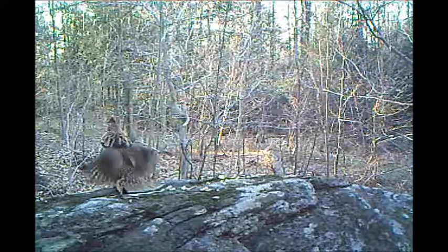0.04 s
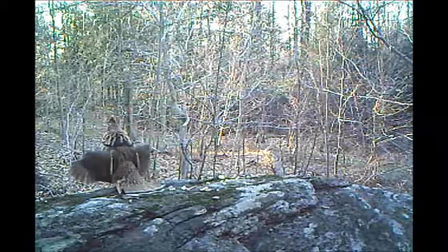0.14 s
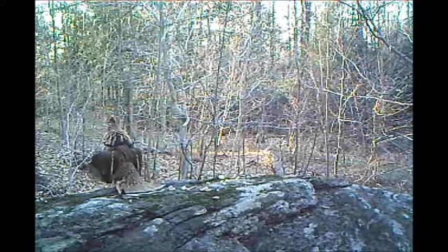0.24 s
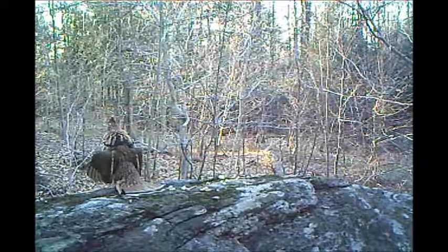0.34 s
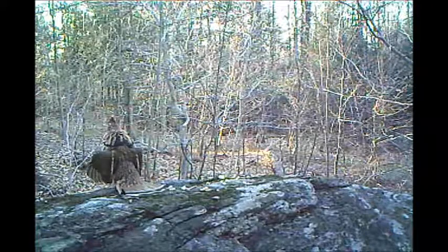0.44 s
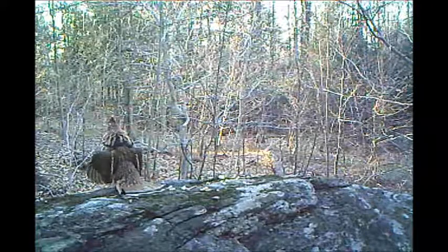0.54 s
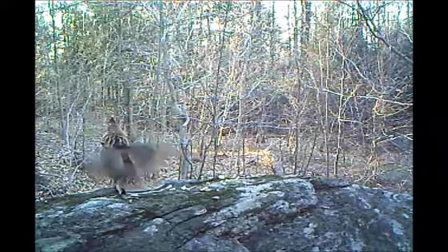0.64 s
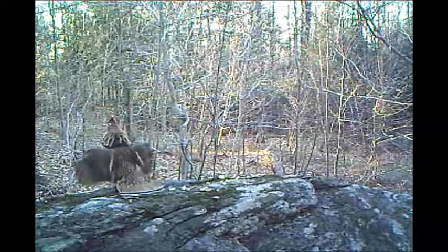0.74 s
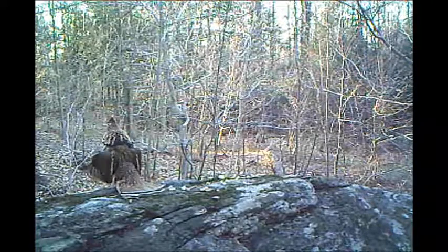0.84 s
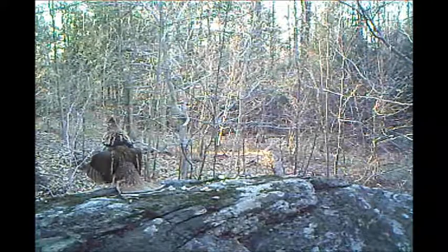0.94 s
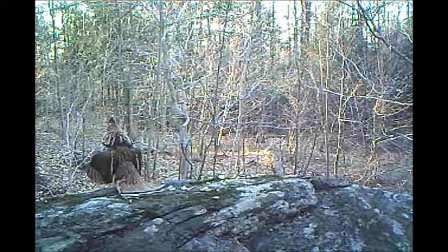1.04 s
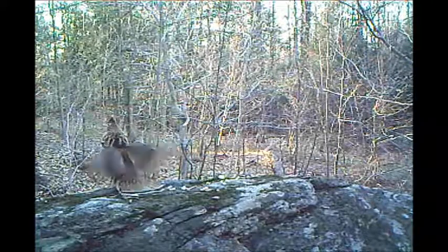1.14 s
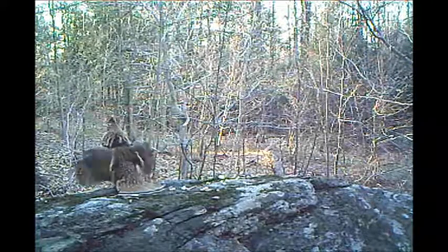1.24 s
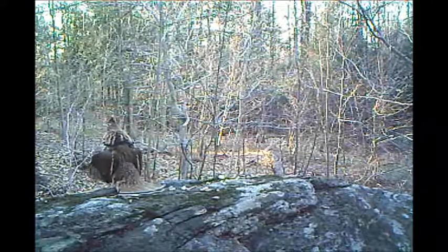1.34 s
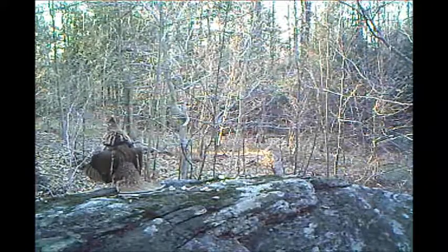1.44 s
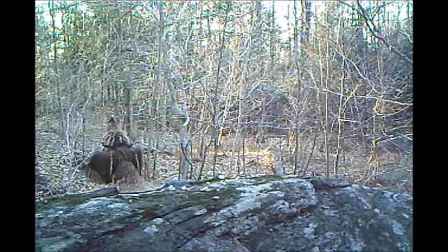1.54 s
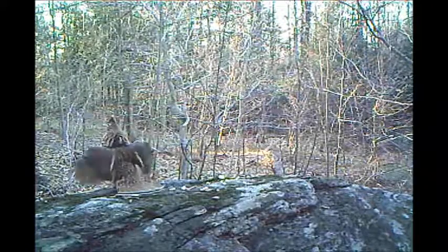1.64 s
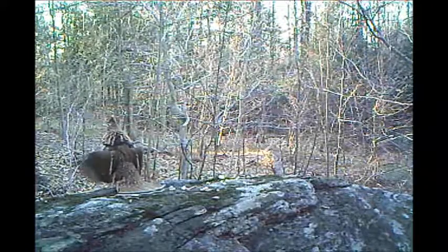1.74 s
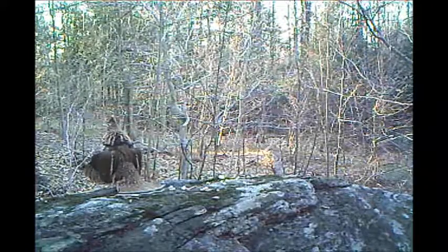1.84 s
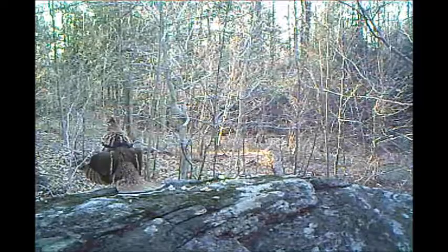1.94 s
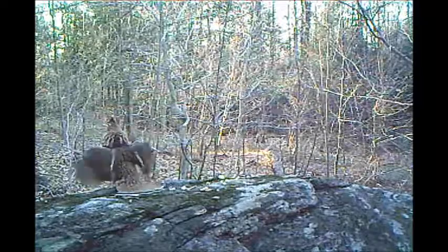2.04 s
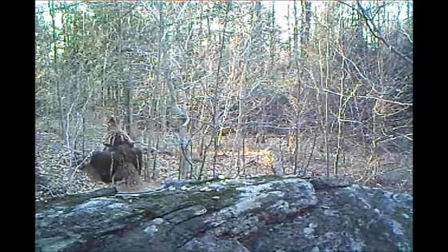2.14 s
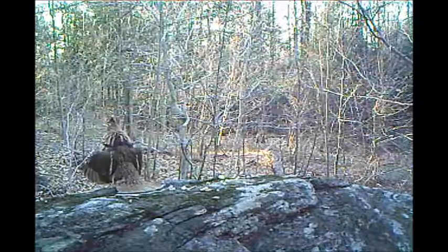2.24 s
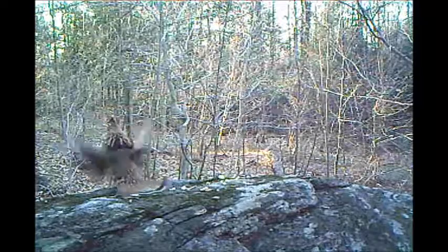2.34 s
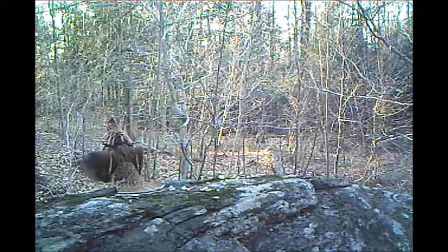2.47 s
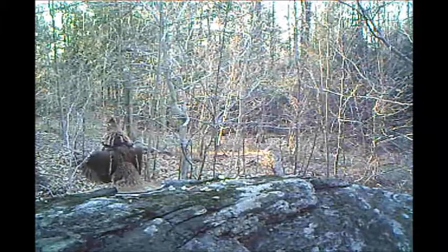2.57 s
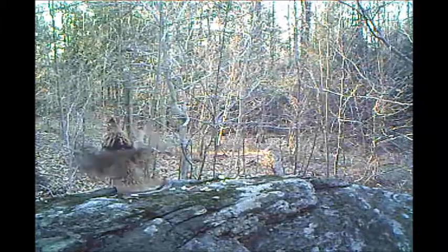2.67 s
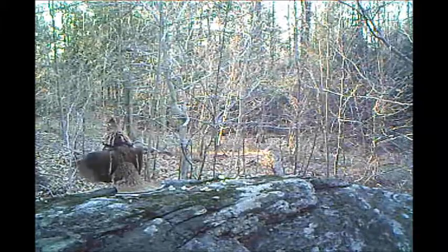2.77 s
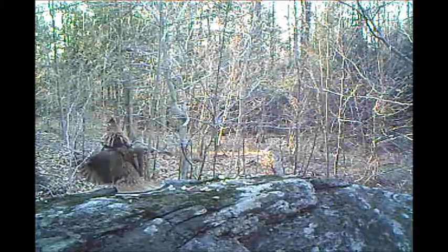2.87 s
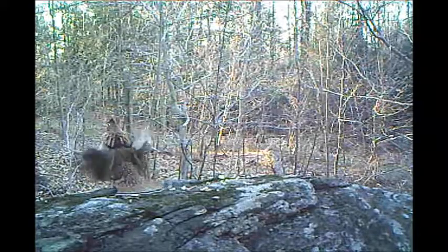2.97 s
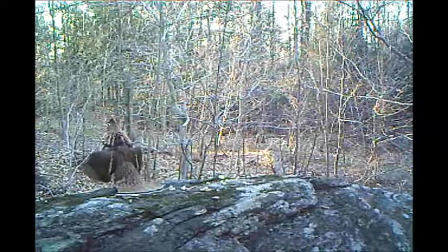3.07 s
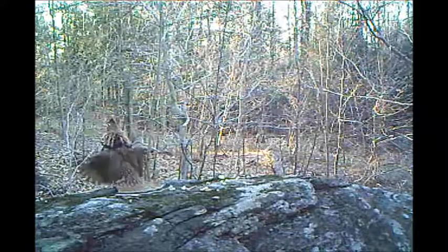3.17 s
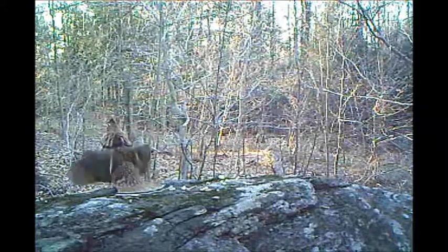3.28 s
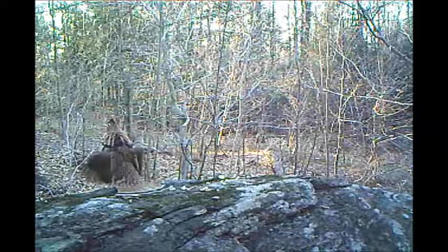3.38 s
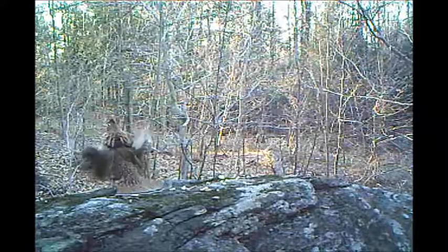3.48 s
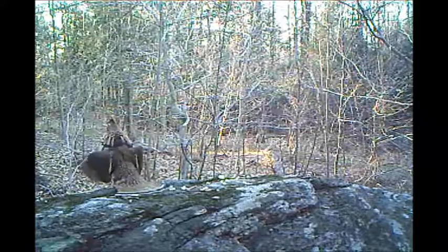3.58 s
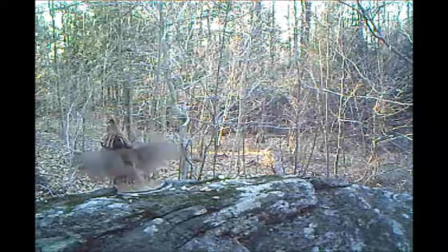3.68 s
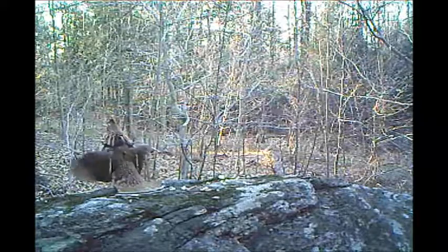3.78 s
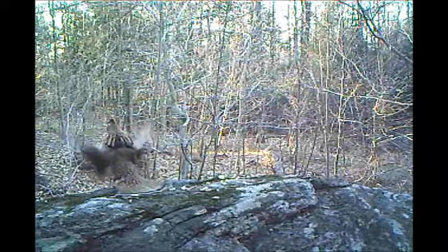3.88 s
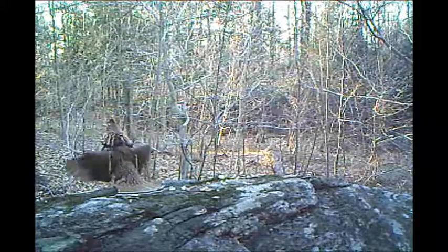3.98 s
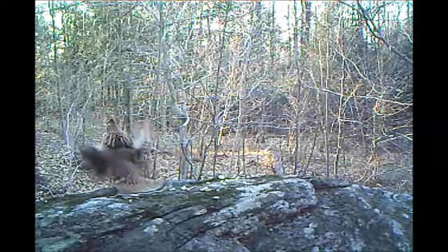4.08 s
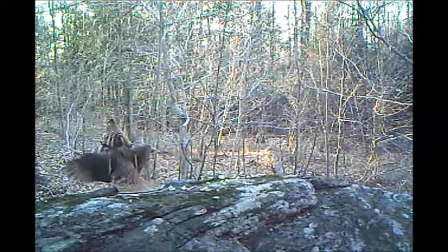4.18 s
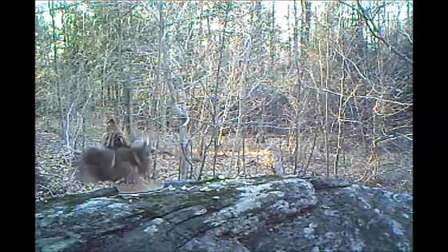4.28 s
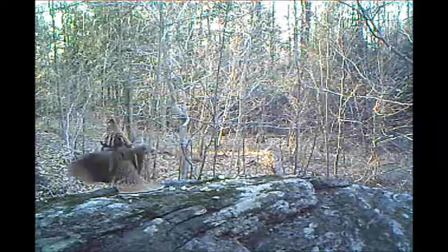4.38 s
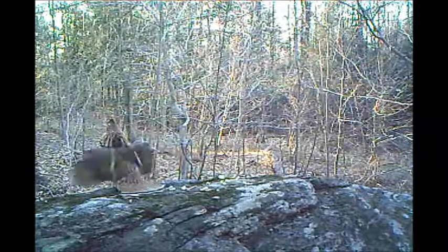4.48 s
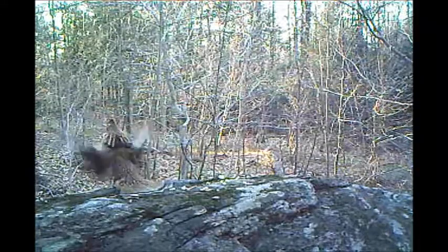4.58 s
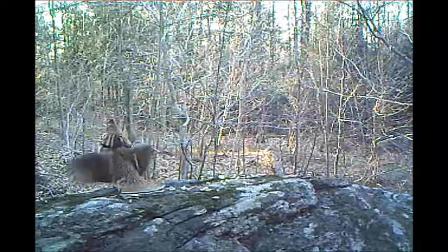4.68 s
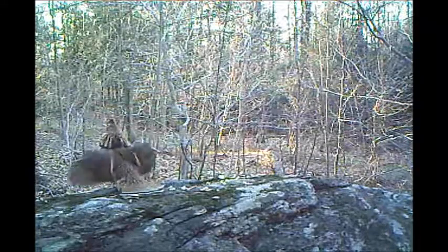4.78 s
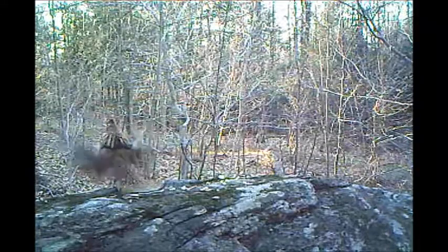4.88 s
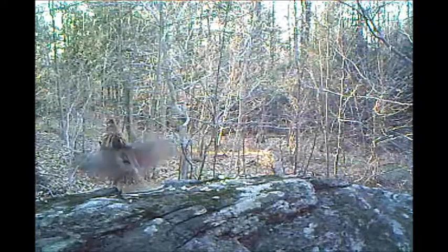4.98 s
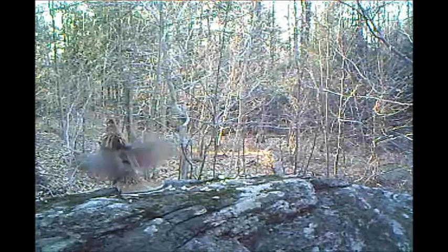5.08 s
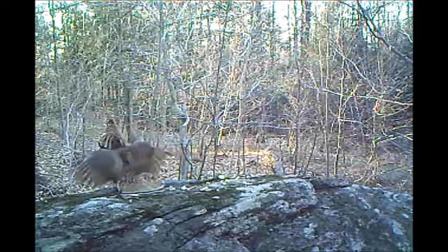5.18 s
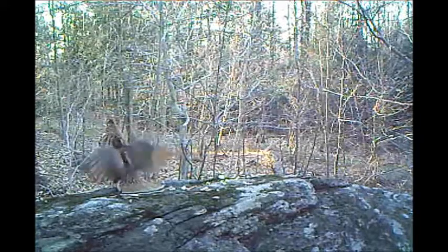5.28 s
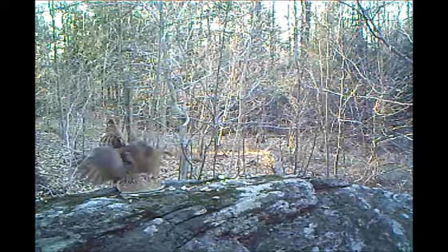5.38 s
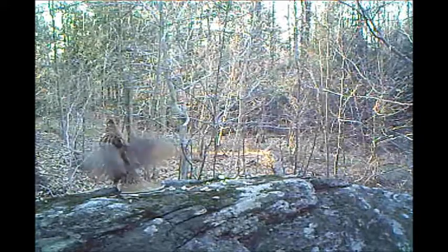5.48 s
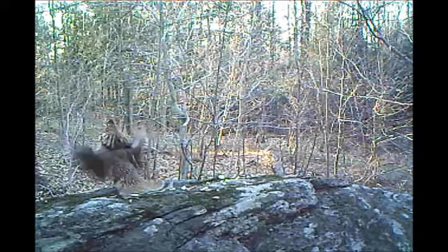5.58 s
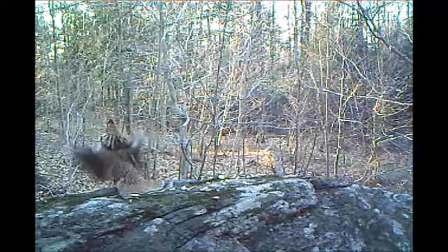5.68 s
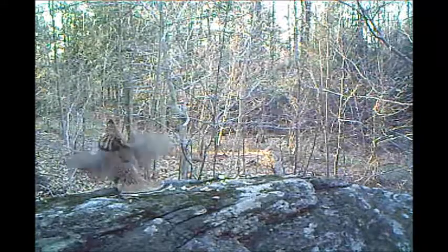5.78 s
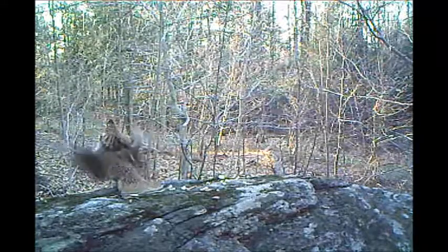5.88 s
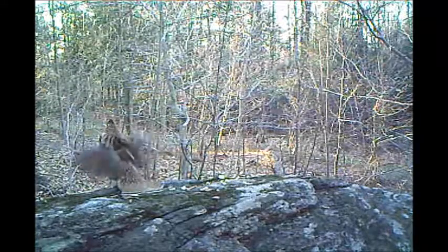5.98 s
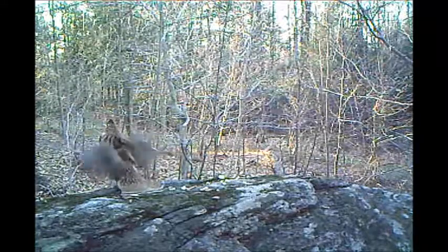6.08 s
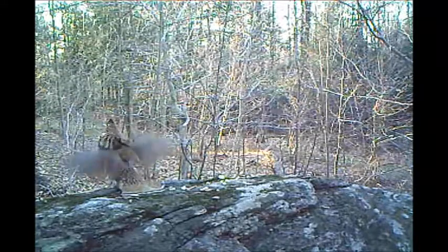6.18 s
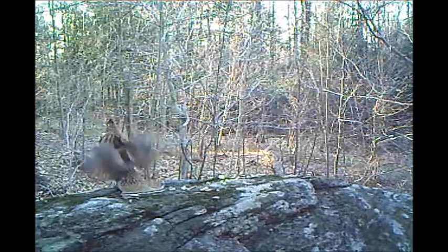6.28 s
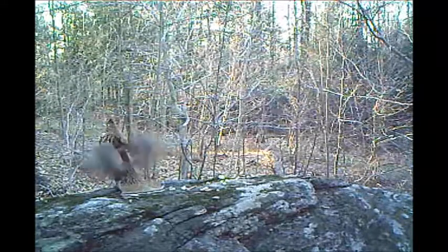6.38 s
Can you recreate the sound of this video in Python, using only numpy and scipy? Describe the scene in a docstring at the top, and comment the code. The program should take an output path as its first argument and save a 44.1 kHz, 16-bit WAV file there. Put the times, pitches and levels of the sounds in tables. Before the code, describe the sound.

Quiet leafless woods, with faint low rumble, a soft airy rush that dips early and slowly returns, light microphone hiss and a barely audible high whine. At about 0.2 seconds a nearby bird gives the first deep, hollow wing thump, a short push of air with a low boomy tail and a faint feathery swish. The next comes about 0.6 seconds later, and the gaps shrink steadily: roughly three beats a second by 2.5 seconds, five by 3.8, nine by 5.2. From about 2.7 to 5.1 seconds a distant bird adds a faint, quick run of short high whistles, each sliding upward, softened by echoes among trees. A tiny tick may show near 4.4 seconds. After 5.5 seconds the thumps weaken slightly and merge into a fluttering roll with denser feather rustle, fastest near 6.1, easing slightly and still going at the end, around 6.4.

```python
"""Wing drumming in bare woods

A ruffed grouse drums on a rock: each wing stroke radiates one deep pulse of air, and the beats
quicken into a roll. Modulated noise forms the feather rustle, hiss and low roughness of each thump.
Far off, gliding sine tones form another bird's run of rising notes. Shaped noise gives the forest
rumble, microphone hiss and a low rush, over a thin whine; once the signal drops out with a tick.
"""
import sys
import numpy as np
from scipy import signal
from scipy.fft import rfft, irfft
from scipy.io import wavfile

SR = 44100
rng = np.random.default_rng(int(sys.argv[2]) if len(sys.argv) > 2 else 0)


def master_out(mix):
    """Clip the mix to full scale and print it as 16-bit PCM to the path in sys.argv[1]."""
    frames = np.transpose(np.atleast_2d(mix))
    ceiling = np.clip(frames, -1, 1)
    pcm = np.round(ceiling * 32767).astype(np.int16)
    wavfile.write(sys.argv[1], SR, pcm)


N = 283102
TIME = np.arange(N) / SR  # s

# Spectra are relative: noise() scales each to rms 1. Rise and decay are exponential time constants.

# Forest rumble and microphone hiss: (frequency [Hz], density [dB per Hz])
FOREST_SPECTRUM = [(8.8, -43), (15, 6.5), (32, 0), (81, -10), (119, -12), (240, -21), (277, -22),
                   (417, -26.5), (455, -27), (610, -30), (944, -32.5), (2780, -36.5), (3220, -38),
                   (13400, -42.5), (16000, -45)]
FOREST_DB = -58  # rms level
# Low rush among the trees, which dies down and slowly returns: (time [s], level [dB])
RUSH_LEVEL = [(0, -76), (.7, -79), (1.3, -85.5), (6.4, -77.5)]
# Colour of the rush: (frequency [Hz], density [dB per Hz])
RUSH_SPECTRUM = [(120, -10.5), (200, 3.5), (330, -4), (600, -9.5), (1200, -17.5), (3000, -33)]
# Faint electronic whine: (frequency [Hz], rms level [dB])
WHINE_TONES = [(8654, -102), (13629, -90)]

# Extent of the far call: (start [s], end [s])
CALL_SPAN = (2.735, 5.05)
# Spacing of the far notes, which slow slightly: (time [s], gap [s])
NOTE_GAP = [(2.73, .129), (3.5, .14), (5.1, .144)]
# The call swells in, holds and fades a little: (time [s], level [dB])
CALL_LEVEL = [(2.73, -75), (2.87, -69.5), (3.35, -67.5), (4.65, -67), (5.1, -68)]
# Highest pitch of each note, rising and sinking over the call: (time [s], frequency [Hz])
CALL_PITCH = [(2.75, 2330), (3.4, 2415), (4.3, 2410), (5.1, 2375)]

# Air tearing through the wing tips, out and back:
# (time from the thump [s], rise [s], decay [s], level [dB])
SWISH_PHASES = [(-.0035, 0.0046, 0.0043, -2.5), (.005, 0.0013, 0.0053, -3)]
# Colour of that hiss: (frequency [Hz], density [dB per Hz])
SWISH_SPECTRUM = [(300, -10.5), (1500, -0.5), (4000, -0.5), (6000, -5), (8000, -5.5), (12000, -6),
                  (16000, -10)]
# Low, rough noise within one stroke: (time from the thump [s], rise [s], decay [s], level [dB])
ROUGHNESS_PHASES = [(.001, .002, 0.0037, -2)]
# Colour of the low, rough noise: (frequency [Hz], density [dB per Hz])
ROUGHNESS_SPECTRUM = [(90, -30), (130, -5), (170, 7.5), (250, -3), (350, -18), (800, -21), (1600, -28.5),
                      (4000, -49)]
# Level of the low, rough noise around each thump, relative to stroke force: (time [s], level [dB])
ROUGHNESS_LEVEL = [(.18, -24.5), (.8, -16.5), (2.3, -21.5), (3.9, -29.5), (4.9, -18.5), (6.4, -22.5)]

# Feathers brushing within one stroke: (time from the thump [s], rise [s], decay [s], level [dB])
BRUSH_PHASES = [(-.0095, 0.0015, 0.0055, 5), (-.001, 0.0023, 0.0067, 1.5), (.012, .001, .008, -3)]
# Colour of the brushing: (frequency [Hz], density [dB per Hz])
FEATHER_SPECTRUM = [(100, -11), (300, -5.5), (600, -4), (1100, -10), (2000, -7), (2550, -6), (3050, 3.5),
                    (3600, -6), (4300, -21.5), (6200, -35), (9000, -30), (10700, -10.5), (12000, -31),
                    (16000, -32)]
# Soft pats as the wings leave the flanks and land again:
# (time from the thump [s], rise [s], decay [s], level [dB])
PAT_PHASES = [(-.0165, .0011, .0025, 0), (.0185, .0007, .0018, 0)]
# Colour of the pats: (frequency [Hz], density [dB per Hz])
PAT_SPECTRUM = [(100, 1.5), (300, 4.5), (700, -3), (1200, -4.5), (2300, -4.5), (3200, 1.5), (4200, -15),
                (6500, -31.5), (10700, -14), (16000, -37)]
RUSTLE_DB_PER_BEAT_RATE = .19  # gain of the feathers for each beat per second

# Extent of the drumming: (start [s], end [s])
DRUM_SPAN = (.183, 6.4)
# Wait until the next beat, which shrinks into the roll, then eases a little: (time [s], gap [s])
BEAT_GAP = [(.183, .60108), (.78, .50322), (1.7, .38615), (2.8, .28261), (3.8, .2049), (5.2, .11159),
            (6.06, .04896), (6.18, .05798), (6.36, .0672)]
# Force of the strokes, steady until the roll leaves no time for a full swing:
# (time [s], level [dB])
STROKE_FORCE = [(.18, -21), (.8, -19.9), (4.83, -19.7), (5.68, -23), (6.08, -22), (6.4, -24.5)]

# Interval in which the signal is lost: (start [s], end [s])
DROPOUT = (4.37064, 4.37083)
CUTOFF_HZ = 15900


def from_db(db):
    """Amplitude ratio: a decibel is a twentieth of a decade of gain."""
    return 10 ** (np.asarray(db) / 20)


def along(curve, s):
    """Linear interpolation: the value of a curve at the given moments."""
    return np.interp(s, *np.transpose(curve))


def noise(spectrum):
    """Spectral shaping: white noise weighted by frequency, scaled to rms 1."""
    hz, level_db = np.transpose(spectrum)
    bins = np.maximum(np.arange(N // 2 + 1) * SR / N, 1)
    low_rolloff = np.minimum(bins / hz[0], 1) ** 2
    gain = from_db(np.interp(np.log(bins), np.log(hz), level_db)) * low_rolloff
    shaped = irfft(rfft(rng.standard_normal(N)) * gain, N)
    return shaped / np.std(shaped)


def flicker(size):
    """Random modulation: normal values drawn every size samples and joined by lines."""
    count = N // size + 2
    return np.interp(np.arange(N) / size, np.arange(count), rng.standard_normal(count))


def swell(t, rise_s, decay_s):
    """Transient envelope: a smooth hump around t = 0 with exponential flanks."""
    return np.exp(-np.logaddexp(-t / rise_s, t / decay_s))


def around(s):
    """Time window: the samples within a tenth of a second of a moment."""
    return slice(max(int((s - 1 / 10) * SR), 0), int((s + 1 / 10) * SR))


def onsets(span, gaps):
    """Varying period: each onset follows the last by the gap that holds just then."""
    times = [span[0]]
    while times[-1] < span[1]:
        times.append(times[-1] + along(gaps, times[-1]))
    return np.array(times)


def forest():
    """Stationary broadband noise: forest rumble and microphone hiss share one spectrum."""
    return from_db(FOREST_DB) * noise(FOREST_SPECTRUM)


def low_rush():
    """Amplitude modulation: a slow level curve shapes low noise among the trees."""
    return from_db(along(RUSH_LEVEL, TIME)) * noise(RUSH_SPECTRUM)


def electronic_whine():
    """Superposition: steady sine tones add up, each given by its rms level."""
    return sum(from_db(db) * np.sqrt(2) * np.sin(2 * np.pi * hz * TIME) for hz, db in WHINE_TONES)


def woods(x, first_s, t60, count=400):
    """Multiple scattering: trunks return many weak echoes that fade with delay; unit energy."""
    delay = rng.random(count) * t60
    echoes = np.zeros(int((first_s + t60) * SR) + 2)
    strength = rng.standard_normal(count) * from_db(-60 * delay / t60)
    echoes[((first_s + delay) * SR).astype(int)] = strength
    return signal.fftconvolve(x, echoes / np.linalg.norm(echoes))[:N]


def far_bird():
    """Frequency modulation: short whistles slide up, level off and sag, blurred by the trees."""
    length_s, climb_hz, waver_db = .064, 205, 3
    call = np.zeros(N)
    for s in onsets(CALL_SPAN, NOTE_GAP):
        window = around(s)
        progress = (TIME[window] - s) / length_s
        # the pitch tops out a quarter of a note length after the centre
        below_top = climb_hz * np.sin(np.pi * 3 / 4 * (progress - 1 / 4)) ** 2
        phase = 2 * np.pi * np.cumsum(along(CALL_PITCH, s) - below_top) / SR
        envelope = np.exp(-np.abs(2 * progress) ** 3)
        call[window] += from_db(along(CALL_LEVEL, s)) * envelope * np.sin(phase)
    call = call * from_db(waver_db * flicker(size=400))
    return call + from_db(-5.5) * woods(call, first_s=.02, t60=.6)


def strokes(beats, phases, levels):
    """Power summation: the phases of a stroke form an envelope, a little different on every beat."""
    vary_db, jitter_s = 1.3, .0007  # standard deviations
    power = np.zeros(N)
    for s, beat_db in zip(beats, levels):
        window = around(s)
        for offset_s, rise_s, decay_s, phase_db in phases:
            late, strong = rng.standard_normal(2)
            hump = swell(TIME[window] - s - offset_s - jitter_s * late, rise_s, decay_s)
            power[window] += (from_db(beat_db + phase_db + vary_db * strong) * hump) ** 2
    return np.sqrt(power)


def wingtip_hiss(beats, swish_db):
    """Turbulent flow: air torn by the wing tips hisses, following the force of the stroke."""
    levels = along(STROKE_FORCE, beats) + swish_db
    return strokes(beats, SWISH_PHASES, levels) * noise(SWISH_SPECTRUM)


def low_roughness(beats):
    """Noise modulation: low noise roughens each thump, by an amount that changes over the drumming."""
    levels = along(STROKE_FORCE, beats) + along(ROUGHNESS_LEVEL, beats)
    return strokes(beats, ROUGHNESS_PHASES, levels) * noise(ROUGHNESS_SPECTRUM)


def feathers(beats, brush_db, pat_db, grain_db):
    """Sliding friction: quills rustle in grains, with soft pats; both grow with force and tempo."""
    feather_db = along(STROKE_FORCE, beats) + RUSTLE_DB_PER_BEAT_RATE / along(BEAT_GAP, beats)
    brush = strokes(beats, BRUSH_PHASES, feather_db + brush_db) * noise(FEATHER_SPECTRUM)
    pats = strokes(beats, PAT_PHASES, feather_db + pat_db) * noise(PAT_SPECTRUM)
    return (brush + pats) * from_db(grain_db * flicker(size=40))


def thumps(beats, slack):
    """Radiation: pressure is the rate of change of the air pulse, a push and then a suction."""
    push_s, release_s = .0033, .0073  # at the strongest stroke
    out = np.zeros(N)
    force_db = along(STROKE_FORCE, beats)
    for s, thump_db in zip(beats, force_db):
        window = around(s)
        speed = from_db(slack * (thump_db - force_db.max()))  # weaker strokes are slower and duller
        pulse = swell(speed * (TIME[window] - s), push_s, release_s)
        pressure = np.gradient(pulse)
        out[window] += from_db(thump_db) * pressure / pressure.max()
    return out


def boom(x):
    """Pressure leak and resonance: thumps overshoot and ring low, with a hollow upper bass."""
    # the microphone leaks the slowest pressure changes; the tiny offset keeps values off zero
    leaked = signal.lfilter(*signal.butter(1, 18, "high", fs=SR), x + 1e-18)
    ring = .24 * signal.lfilter(*signal.iirpeak(55, 3.8, fs=SR), leaked)
    hollow = .32 * signal.lfilter(*signal.iirpeak(108, 2.5, fs=SR), leaked)
    return leaked + ring - hollow


def scene():
    """Superposition: background, far bird, and the close drummer with its faint echoes."""
    background = forest() + low_rush() + electronic_whine()
    beats = onsets(DRUM_SPAN, BEAT_GAP)
    drum = boom(thumps(beats, slack=0.4))
    rustle = feathers(beats, brush_db=-35.0, pat_db=-30.0, grain_db=2.0)
    rustle = rustle + wingtip_hiss(beats, swish_db=-31.5) + low_roughness(beats)
    low_echoes = from_db(-30) * woods(drum, first_s=.03, t60=.35)
    high_echoes = from_db(-12.0) * woods(rustle, first_s=.012, t60=.55)
    return (background + far_bird() + low_echoes + high_echoes + rustle + drum)[None]


def record(dry):
    """Gating and band limiting: an instant of lost signal ticks; a steep filter cuts the top."""
    live = (TIME < DROPOUT[0]) | (TIME > DROPOUT[1])
    low_pass = signal.ellip(10, .1, 80, CUTOFF_HZ, fs=SR, output="sos")
    return signal.sosfilt(low_pass, dry * live)


dry = scene()
out = record(dry)
master_out(out)
```